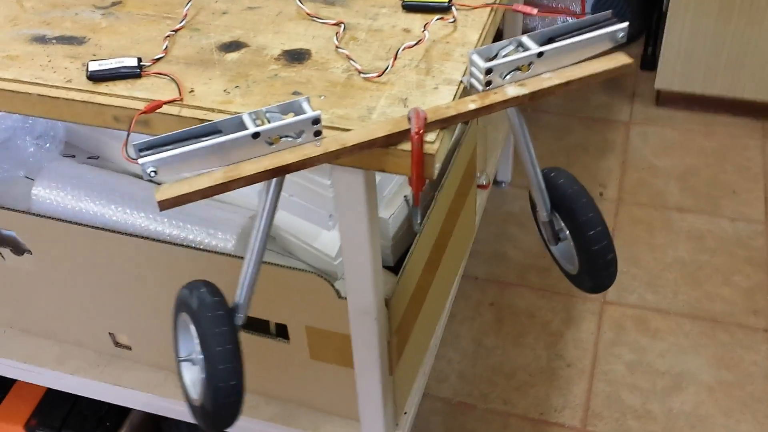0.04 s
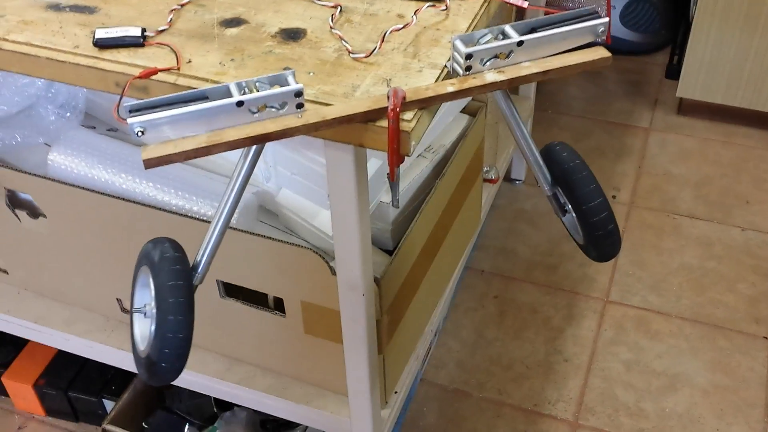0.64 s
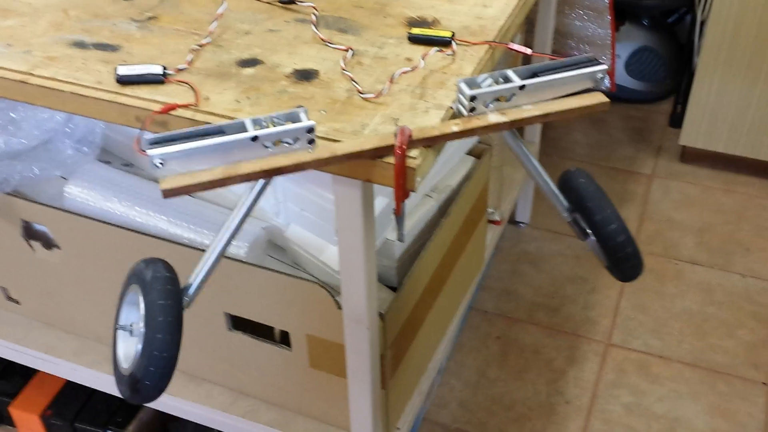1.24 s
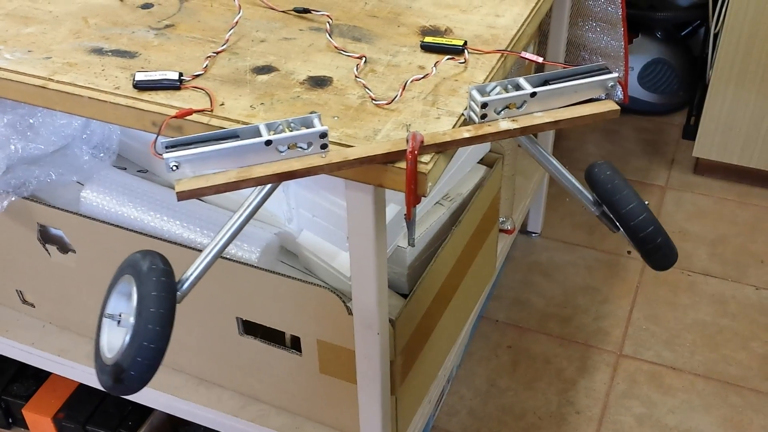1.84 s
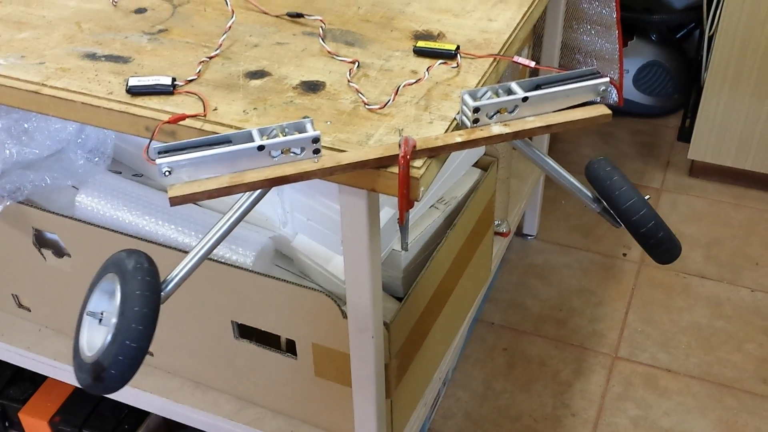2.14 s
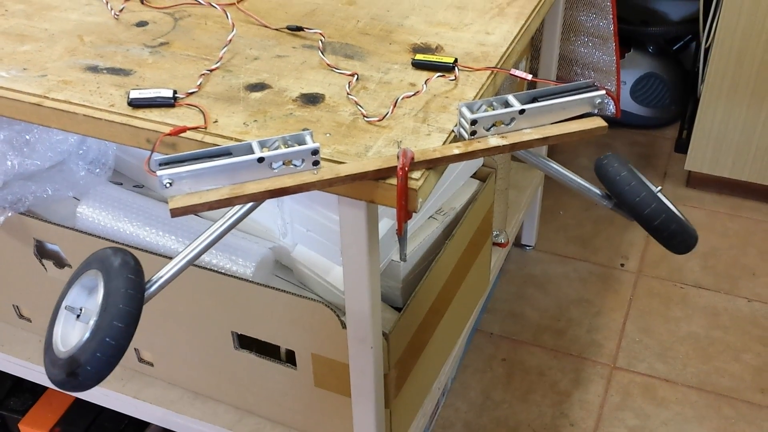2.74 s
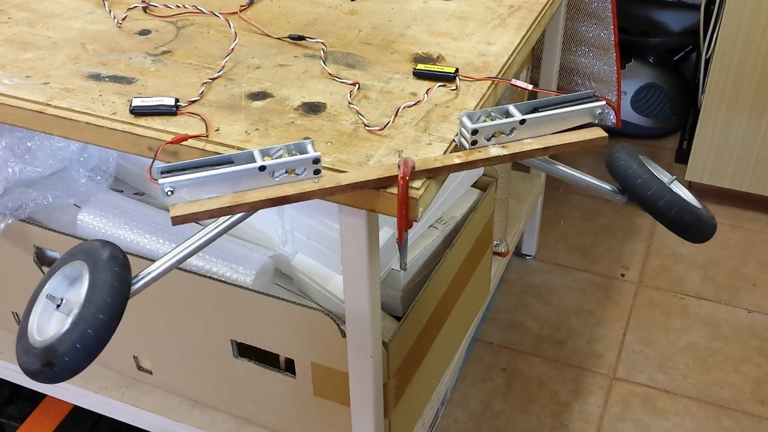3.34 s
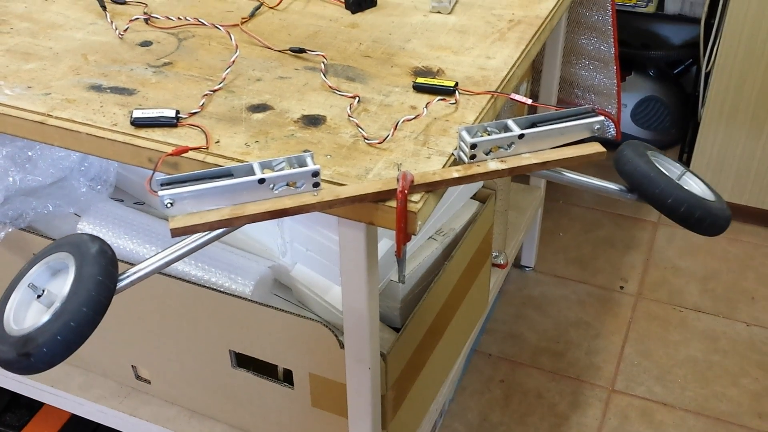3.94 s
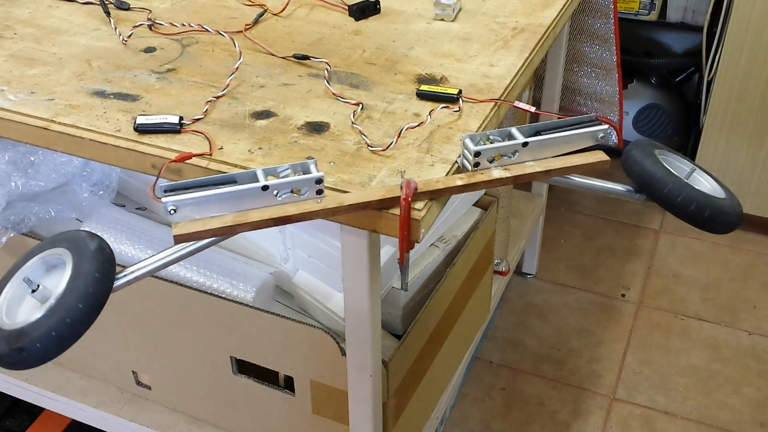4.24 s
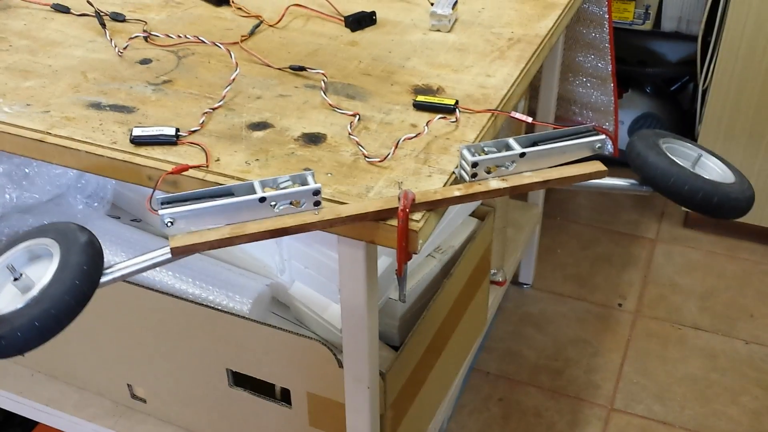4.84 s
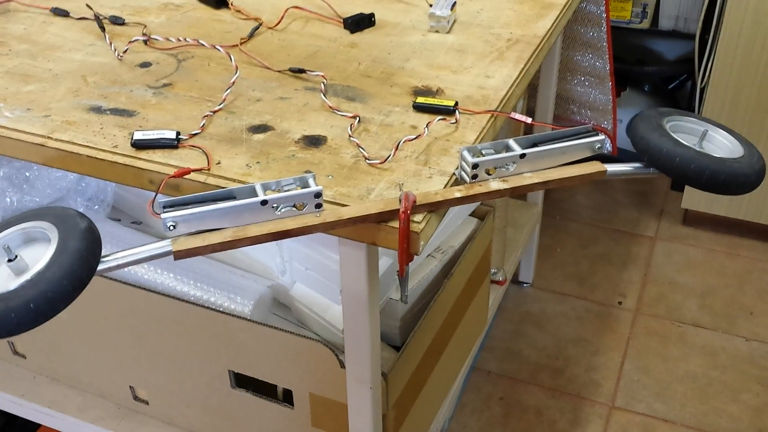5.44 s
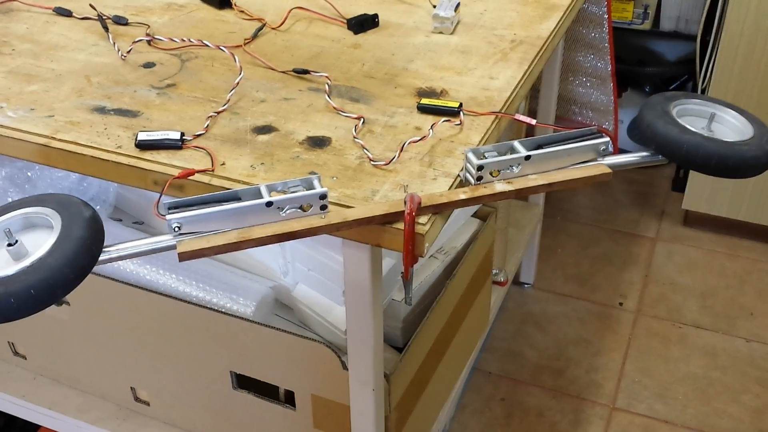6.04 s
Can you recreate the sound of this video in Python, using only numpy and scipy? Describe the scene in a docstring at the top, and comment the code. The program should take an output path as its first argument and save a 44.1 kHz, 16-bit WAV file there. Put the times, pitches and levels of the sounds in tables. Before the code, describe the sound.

Two small electric actuators run close by, raising model landing gear with a steady high whine, a hum and a pulsing gear rasp. Their pitches drift apart and sink slightly as the load grows, while brief squeals and tiny metallic pings come through. Near the end the legs scrape in short gritty jerks and the motors pick up a little. The small workshop adds a short echo, with faint low thuds and rumble underneath.

```python
"""A close, rasping whine: two electric actuators on a workbench swing model landing gear up.
Each motor hums and whines at multiples of its speed and slows as the load grows; the two drift apart.
Gears and lead screws (threaded rods that move the legs) rasp, louder once in each turn of a screw.
The first actuator also squeals and pings, and the legs scrape as they near their stops.
The small workshop adds a short echo. Underneath are the bench's boom, soft thuds and a low rumble."""
import sys
import numpy as np
from scipy import signal
from scipy.fft import rfft, irfft, next_fast_len
from scipy.io import wavfile
from scipy.ndimage import map_coordinates

SR = 44100
rng = np.random.default_rng(int(sys.argv[2]) if len(sys.argv) > 2 else 0)


def materialize(psi):
    """Save the field psi as 16-bit PCM at rate SR to the path in sys.argv[1].

    A 1-D psi becomes a single channel; in a 2-D psi each row is a channel.
    """
    bounded = np.clip(np.atleast_2d(psi).T, -1, 1)
    quanta = np.round(bounded * 32767).astype(np.int16)
    wavfile.write(sys.argv[1], SR, quanta)


N = 268128
TIME = np.arange(N) / SR

# Turns per second of each motor; the legs are heaviest near 5 s (t/s, f/Hz)
FIRST_MOTOR_SPEED = [(0.0, 374.7), (0.64, 355.0), (2.57, 338.3), (2.61, 342.4), (3.33, 328.8),
                     (3.94, 326.6), (4.03, 316.4), (5.42, 315.2), (5.49, 325.5), (5.71, 322.7),
                     (5.74, 331.9), (6.08, 348.8)]
SECOND_MOTOR_SPEED = [(0, 369), (.5, 357), (2, 341), (2.8, 340), (4, 323), (5.1, 298), (5.35, 300),
                      (6.08, 342)]
# How strong the motors' high whine is over time (t/s, relative level/dB)
WHINE_LEVEL = [(0, -32), (1.2, -36), (2, -36), (3.5, -35.5), (4.8, -35.5), (5.5, -36), (6.08, -37)]
# How strong the gears' rasp is over time (t/s, relative level/dB)
RASP_LEVEL = [(0, -31.5), (1.4, -30), (3.3, -30), (5.1, -32.5), (6.08, -32.5)]
# How the housings and the board colour the rasp (f/Hz, gain/dB)
HOUSING_COLOUR = [(105, -79), (270, -7), (520, -8), (830, -7.5), (1260, -5), (1660, 0.8), (2050, -3),
                  (2650, 0.5), (3050, 1.5), (3900, 3.5), (4500, 2.5), (5350, 5.5), (7400, 4.5), (9250, -4),
                  (12100, -1.5), (13000, -1.5), (14600, -8.5)]
# How a heavy load changes that colour (f/Hz, gain/dB)
LOAD_COLOUR = [(700, 5), (1600, 3), (2900, -2.5), (4200, 2), (5200, 0.5), (6600, -5.5), (9000, 2),
               (14000, -0.5)]
# Tones of a gear at half motor speed (cycles per turn, relative level/dB at light load, at heavy load)
GEAR_TONES = [(1, -58, -62), (3, -58, -58), (4, -51.5, -59), (7, -59, -55), (8, -48, -48), (9, -49.5, -52),
              (10, -49, -51), (12, -56, -57), (14, -51, -57), (18, -54, -57), (22, -46.5, -52),
              (24, -50, -43.5), (26, -49, -51), (28, -47.5, -54), (30, -49.5, -54), (32, -48.5, -46),
              (36, -47.5, -44), (42, -46, -47), (44, -48, -55), (54, -55, -45)]
# Moments when the first housing sings (t/s, multiple of motor speed, relative level/dB, length/s)
HOUSING_SQUEALS = [(.6, 9, -35.5, .07), (.845, 9, -33.5, .06), (.857, 11, -35, .025), (1.08, 9, -33.5, .06),
                   (1.099, 11, -35, .02), (1.29, 9, -39, .05), (1.543, 11, -33.5, .022),
                   (1.62, 9, -37, .05), (1.839, 11, -33, .02), (1.88, 9, -38.5, .06), (2.12, 9, -38.5, .06),
                   (2.153, 11, -33, .025), (2.333, 11, -35, .02), (2.38, 9, -40, .05),
                   (2.581, 11, -34, .022), (3.577, 12, -37, .03), (3.857, 12, -37.5, .03),
                   (4.07, 15, -38, .04), (4.15, 16, -36.5, .06), (4.195, 15, -34.5, .04),
                   (4.335, 15, -35, .035), (4.36, 16, -36.5, .05), (4.465, 15, -36.5, .035),
                   (4.612, 15, -31.5, .042), (4.755, 15, -34.5, .04), (4.885, 15, -31, .045),
                   (4.91, 16, -36, .045), (5.01, 16, -36.5, .04), (5.17, 15, -35.5, .045),
                   (5.29, 15, -38, .04), (5.3, 16, -37, .05), (5.43, 15, -37.5, .04)]
# Scrapes of the legs near their stops (t/s, relative level/dB, length/s, ring f/Hz, ring width/Hz)
END_SCRAPES = [(5.43, -36, .03, 5050, 35), (5.515, -32.5, .035, 5600, 90), (5.545, -31.5, .028, 5170, 40),
               (5.59, -35, .05, 5000, 30), (5.63, -34.5, .035, 5620, 110), (5.677, -32.5, .03, 5220, 110),
               (5.749, -27.5, .02, 5480, 280), (5.796, -28, .028, 5400, 230), (5.9, -37, .06, 5400, 150),
               (6.04, -30, .025, 5380, 200)]
# Soft low thuds in the bench (t/s, relative level/dB)
SOFT_THUDS = [(1.25, -54), (1.85, -48), (1.89, -49), (2.73, -56.5), (2.88, -56.5), (3.19, -57),
              (3.84, -45), (4.39, -56), (4.47, -45), (5.43, -51), (5.78, -60)]
# The colour of the bench's boom (f/Hz, gain/dB)
BOOM_COLOUR = [(27, -34), (51, 0.5), (103, 4.5), (163, 2), (232, -1), (405, -5), (1450, -99)]
# How strong the bench's steady boom is over time (t/s, relative level/dB)
DRONE_LEVEL = [(0, -57), (4.6, -60.5), (5.4, -67)]
# How far direct sound at the left microphone runs ahead of the right (f/Hz, phase/rad)
LEFT_PHASE_LEAD = [(0, 0), (330, .5), (1000, 1.5)]
# How much louder the left microphone is than the right (f/Hz, difference/dB)
LEFT_MINUS_RIGHT = [(710, -0.5), (1510, 3), (2510, 4.5), (3310, 2), (4210, -7), (4910, 0), (5610, 5.5),
                    (6310, 6.5), (7210, 3), (8610, -1.5), (10510, -5), (12210, -6.5), (13510, -0.5)]


def actuator(speed_table, tight_spot, mount_db, tones_db, light_hz=350, sag_hz=33, screw_ratio=86):
    """One motor drives gears and a lead screw. Returns its stereo sound and its (turns, rub)."""
    speed_hz = curves(speed_table)[0]
    load = np.clip((light_hz - speed_hz) / sag_hz, 0, 1)  # 0 is light, 1 is heavy
    screw_turns = np.cumsum(speed_hz) / SR / screw_ratio
    throb = np.cos(2 * np.pi * 2 * (screw_turns - .75))  # the load peaks twice per screw turn
    rub_db = screw_rub(screw_turns, *tight_spot)
    rub = rub_db - rub_db.mean()
    turns = motor_turns(speed_hz, load, throb, rub)
    tone_gain = undb(under_load(tones_db, load))
    rasp = undb(curves(RASP_LEVEL)[0]) * screw_scrape(gear_rasp(turns), rub_db)
    rasp = (1 - load) * rasp + load * colour(rasp, LOAD_COLOUR)
    hum = close_by(motor_hum(turns, speed_hz, load, screw_turns, throb, mount_db))
    whine = close_by(tone_gain * commutator_whine(turns, speed_hz, load), direct_db=-6, room_db=-2)
    gears = room(rasp + tone_gain * gear_tones(turns, load, throb, rub))
    return hum + whine + gears, (turns, rub)


def motor_turns(speed_hz, load, throb, rub, hunt=.003, tremble=.003, slip=.0016):
    """Turns made so far. The speed trembles, lifts as the screw slips and dips with each throb."""
    unrest = tremble * wander(50) + slip * rub - hunt * throb
    unrest *= 1 - .65 * load  # load steadies the motor
    return np.cumsum(speed_hz * (1 + unrest)) / SR


def commutator_whine(turns, speed_hz, load, can_hz=12250, can_db=-43):
    """The motor's spinning contacts whine, purer under load; its brushes ring the metal can."""
    whine = undb(curves(WHINE_LEVEL)[0]) * spin_tone(turns, 32, flutter_db=4.5, play=.75 - .35 * load)
    can_gain = undb(can_db) * bell(speed_hz - 345, width=12)  # strongest at middling speeds
    return whine + can_gain * ring(can_hz, width_hz=130)


def motor_hum(turns, speed_hz, load, screw_turns, throb, mount_db, board_hz=1060):
    """The off-balance rotor hums; its three poles add a ripple that the mount passes into the board."""
    ripple_db = under_load((-45.5, -46.5), load) + mount_db
    ripple_db += 5.4 * bell(3 * speed_hz - board_hz, width=17)  # louder at the board's resonance
    ripple_db += under_load((3.2, 2.2), load) * throb
    ripple_db += 2.2 * np.cos(2 * np.pi * 4 * screw_turns)  # four even flutters per screw turn
    hum = undb(under_load((-55.5, -51), load)) * spin_tone(turns, 1, flutter_db=6, play=.13)
    ripple = spin_tone(turns, 3, flutter_db=3.5, play=.08 + .05 * load, flutter_per_s=80)
    return hum + undb(ripple_db) * ripple


def gear_rasp(turns, grit=.5, bunching=.42, worn_db=-9):
    """Teeth and brushes make countless tiny hits, bunched once a turn; worn spots come round again."""
    contacts = rng.standard_normal(N) * np.exp(grit * wander(2300))
    contacts *= 1 + bunching * np.cos(2 * np.pi * turns)
    wear = rng.standard_normal((128, 112))  # 112 spots per turn, blending to a new row every 24 turns
    worn = map_coordinates(wear, [turns / 24, turns % 1 * 112], order=3, mode="grid-wrap")
    worn = colour(worn, [(900, -25), (2500, 0)])
    return unit(colour(unit(contacts) + undb(worn_db) * unit(worn), HOUSING_COLOUR))


def screw_rub(screw_turns, place, half_width, rise_db):
    """The screw binds over part of each turn: a quick rise in dB, a hold and a quick release."""
    turns_away = (screw_turns - place + .5) % 1 - .5
    return rise_db * np.exp(-(turns_away / half_width) ** 4)


def screw_scrape(rasp, rub_db):
    """A rubbing screw lifts the rasp most at 4-8 kHz; the small housings give off little bass."""
    extra_rasp = rasp * (undb(rub_db) - 1)
    lift = colour(extra_rasp, [(900, -14), (3000, -7), (5400, 1.5), (7500, 0), (10000, -6)])
    return colour(rasp, [(50, -30), (200, -4), (850, -2), (1300, 0)]) + lift


def gear_tones(turns, load, throb, rub, throb_db=3, boost_db=2.7):
    """The teeth sound in fits: they swell where the screw rubs and, under load, with every throb."""
    tones = 0
    for multiple, light_db, heavy_db in GEAR_TONES:
        db = under_load((light_db, heavy_db + throb_db * throb), load)
        db += rub * min(multiple / 30, 1)  # rubbing lifts the high tones most
        tone = spin_tone(turns / 2, multiple, flutter_db=5, play=.13 + multiple / 450, flutter_per_s=45)
        tones += undb(db + boost_db) * tone
    return tones


def housing_squeals(turns):
    """The housing sings briefly when a multiple of the motor's speed meets one of its resonances."""
    squeals = 0
    for peak_s, multiple, db, length_s in HOUSING_SQUEALS:
        tone = spin_tone(turns, multiple, flutter_db=3, play=.09, flutter_per_s=90)
        squeals += swell(peak_s, db, length_s) * tone
    return squeals


def tooth_pings(rub, per_s=40, level_db=-40, ring_s=.008, pitch_range_hz=(3800, 6000)):
    """Teeth catch at random and ring briefly, each at its own pitch, louder where the screw rubs."""
    pings, age = np.zeros(N + SR), TIME[:SR // 16]
    envelope = age / ring_s * np.exp(1 - age / ring_s)
    for when, pitch, size in rng.random((int(per_s * TIME[-1]), 3)):
        start, hz = int(when * N), np.interp(pitch, (0, 1), pitch_range_hz)
        pings[start:start + len(age)] += 2 * size * envelope * np.sin(2 * np.pi * hz * age)
    return undb(level_db + rub) * pings[:N]


def end_scrapes(frame_hz=7330, frame_db=-7, grit_db=-8.5):
    """Near the stops the legs grind in gritty jerks; each rings at its own pitch and rings the frame."""
    contacts = rng.standard_normal(N) * np.exp(.6 * wander(900))
    grit = unit(colour(contacts, [(2500, -25), (5400, 0), (7500, -3), (10000, -20)]))
    frame_and_grit = undb(frame_db) * ring(frame_hz, width_hz=70) + undb(grit_db) * grit
    return sum(swell(s, db, length_s) * (ring(hz, width_hz) + frame_and_grit)
               for s, db, length_s, hz, width_hz in END_SCRAPES)


def low_background(thuds_per_s=3, thud_db=-60, rise_s=.006, fade_s=.035):
    """The bench booms faintly under the motors, with soft low thuds now and then."""
    thud_times = (np.arange(32) + rng.random(32)) / thuds_per_s
    faint_thuds = [(s, thud_db) for s in thud_times if s < TIME[-1]]
    envelope = 0
    for s, db in SOFT_THUDS + faint_thuds:
        age = np.maximum(TIME - s, 0)
        envelope += 2 * undb(db) * np.exp(-age / fade_s) * (1 - np.exp(-age / rise_s))
    centre_noise = rng.standard_normal((2, 1, N))  # the same on left and right
    boom_noise, rumble_noise = centre_noise + .65 * rng.standard_normal((2, 2, N))
    boom = unit(colour(boom_noise, BOOM_COLOUR))
    drone = colour(boom, [(60, -22), (125, -1), (162, 6), (240, -6)])
    drone *= undb(curves(DRONE_LEVEL)[0] + 4 * wander(18))
    return envelope * boom + drone + low_rumble(rumble_noise)


def low_rumble(noise, start_db=-53, hold_s=.42, fade_db_per_s=30, floor_db=-76, vary_db=14):
    """A low rumble holds, then fades to a faint low noise, its level varied at random."""
    rumble = unit(colour(noise, [(25, -25), (42, 0), (50, 0), (70, -9), (100, -11), (300, -50)]))
    fading = undb(start_db - fade_db_per_s * np.maximum(TIME - hold_s, 0))
    lingering = undb(floor_db + vary_db * np.tanh(wander(9.2)))
    return (fading + lingering) * rumble


def close_by(x, direct_db=-2, room_db=-6):
    """Sound from the frames' open side goes straight to the microphones, out of step, plus some room."""
    bin_hz = np.arange(N // 2 + 1) * SR / N
    lead = np.interp(bin_hz, *np.transpose(LEFT_PHASE_LEAD))
    direct = irfft(rfft(x) * np.exp(.5j * np.array([lead, -lead])), N)
    return undb(direct_db) * direct + undb(room_db) * room(x)


def room(x, tail_s=.25, scatter_s=.0037, scatter_db=6, sway_per_s=4):
    """Each microphone hears dulled direct sound, quick scatter off the bench top and a short echo."""
    age = TIME[:SR // 4]
    tail = np.exp(-np.log(1000) * age / tail_s)  # falls 60 dB in tail_s
    scatter = undb(scatter_db) * np.exp(-age / scatter_s)
    echoes = rng.standard_normal((3, 2, len(age))) * (tail + scatter)
    echoes /= np.sqrt(np.sum(echoes ** 2, axis=-1, keepdims=True))
    # The blend of three echo patterns shifts as the hand holding the microphones sways.
    blend = np.array([wander(sway_per_s) for _ in echoes])
    blend /= np.sqrt(np.sum(blend ** 2, axis=0))
    reflected = sum(share * signal.oaconvolve(x[None], paths, axes=1)[:, :N]
                    for share, paths in zip(blend, echoes))
    direct = colour(x, [(390, -3), (1020, -2.5), (1700, -13), (6600, -19)])
    return direct + colour(reflected, [(410, -5), (1500, -.1)])


def spin_tone(turns, multiple, flutter_db, play, flutter_per_s=55):
    """A fluttering tone at a multiple of the spin; play (slack in the gears) shakes its phase."""
    cycles = multiple * turns + rng.random() + play * wander(60)
    flutter = undb(flutter_db * np.tanh(wander(flutter_per_s)))
    return np.sqrt(2) * np.sin(2 * np.pi * cycles) * flutter


def ring(hz, width_hz):
    """Metal rings around one pitch, kept going by irregular contacts."""
    angle = 2 * np.pi * hz * TIME
    return wander(3 * width_hz) * np.sin(angle) + wander(3 * width_hz) * np.cos(angle)


def under_load(levels_db, load):
    """Slide between a pair of levels: (light load, heavy load)."""
    light_db, heavy_db = levels_db
    return light_db + load * (heavy_db - light_db)


def swell(peak_s, db, length_s):
    """A smooth rise and fall in strength around one moment."""
    ticks = TIME[::64]
    return np.interp(TIME, ticks, undb(db) * bell(ticks - peak_s, length_s / 2))


def bell(away, width):
    """1 at the centre, falling away to both sides."""
    return np.exp(-.5 * (away / width) ** 2)


def wander(per_s):
    """A random drift of typical size 1 that changes about per_s times a second."""
    knots = rng.standard_normal(32768)
    return unit(np.interp(TIME * per_s, np.arange(len(knots)), knots))


def colour(x, points):
    """Turn low and high pitches up or down along (f/Hz, gain/dB) points."""
    hz, db = np.transpose(points)
    size = next_fast_len(N + 4096)
    bin_hz = np.maximum(np.arange(size // 2 + 1) * SR / size, 1)
    gain = undb(np.interp(np.log(bin_hz), np.log(hz), db))
    return irfft(rfft(x, size) * gain, size)[..., :N]


def curves(table):
    """Join the points of a time table with straight lines, one curve per value column."""
    times, *columns = np.transpose(table)
    return [np.interp(TIME, times, column) for column in columns]


def unit(x):
    """Scale to an average strength (rms) of 1."""
    return x / np.sqrt(np.mean(x ** 2))


def undb(db):
    """Turn decibels into a gain to multiply by."""
    return np.exp(np.asarray(db) * (np.log(10) / 20))


def scene():
    """Both actuators run throughout; motors and squeals arrive directly, gears by bench and room."""
    # tight_spot is where the screw binds (place/turns, half width/turns, rise/dB).
    first, (turns, rub) = actuator(FIRST_MOTOR_SPEED, tight_spot=(.55, .2, 3),
                                   mount_db=-2, tones_db=(-4, -3))
    second, _ = actuator(SECOND_MOTOR_SPEED, tight_spot=(.355, .1, 1.1),
                         mount_db=-8.5, tones_db=(-5, -8))
    squeals = close_by(housing_squeals(turns), direct_db=.5, room_db=-10)
    pings = close_by(tooth_pings(rub))
    return first + second + squeals + pings + close_by(end_scrapes()) + low_background()


def record(dry, top_hz=14700):
    """Each microphone colours the sound in its own way; the highest treble is cut steeply."""
    channels = [colour(x, [(hz, side * db / 2) for hz, db in LEFT_MINUS_RIGHT])
                for x, side in zip(dry, (1, -1))]
    return signal.sosfilt(signal.ellip(12, .1, 80, top_hz, fs=SR, output="sos"), channels)


dry = scene()
out = record(dry)
materialize(out)
```